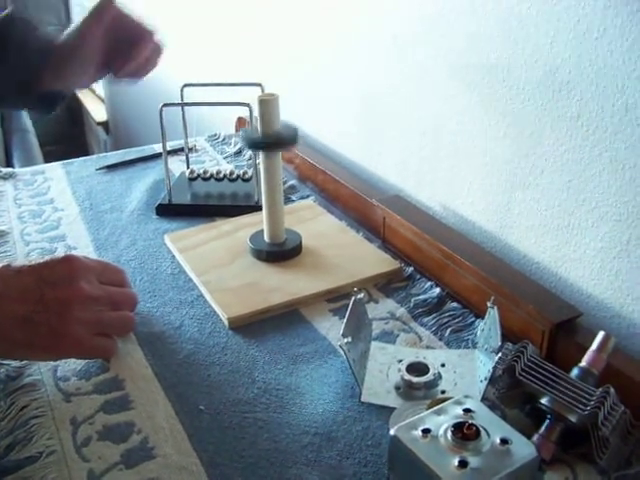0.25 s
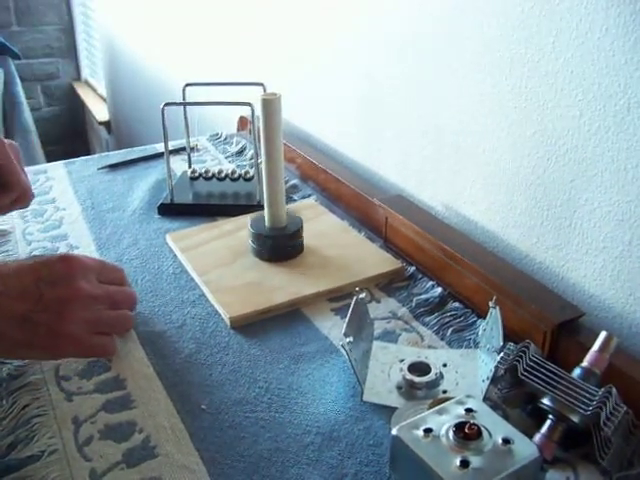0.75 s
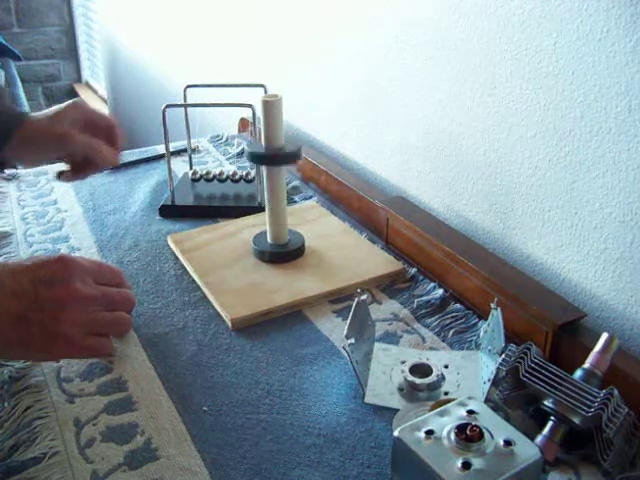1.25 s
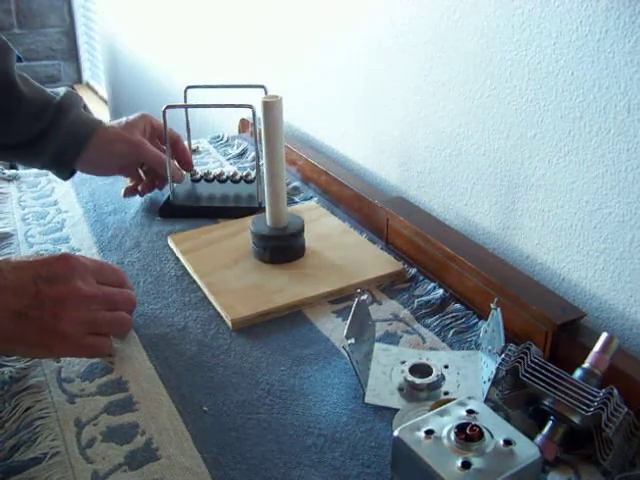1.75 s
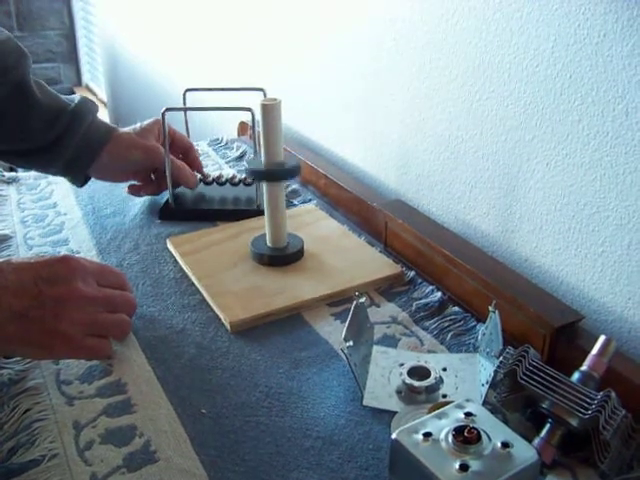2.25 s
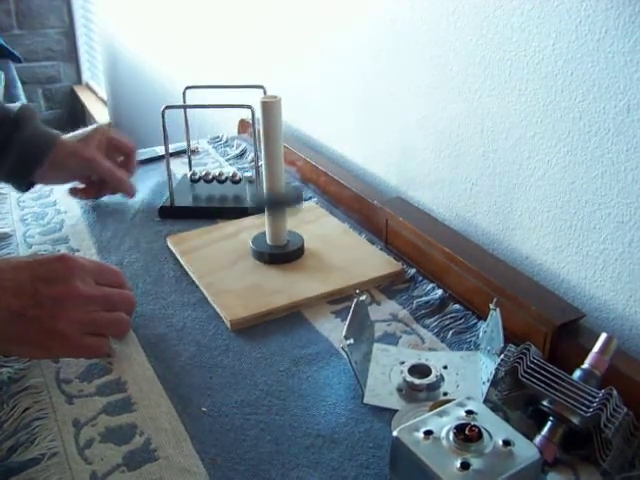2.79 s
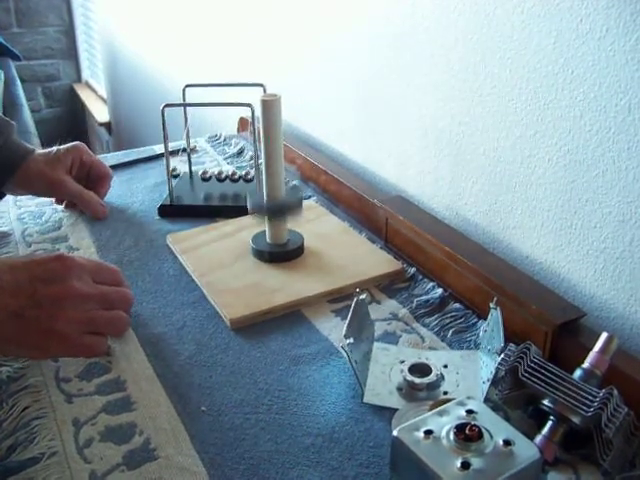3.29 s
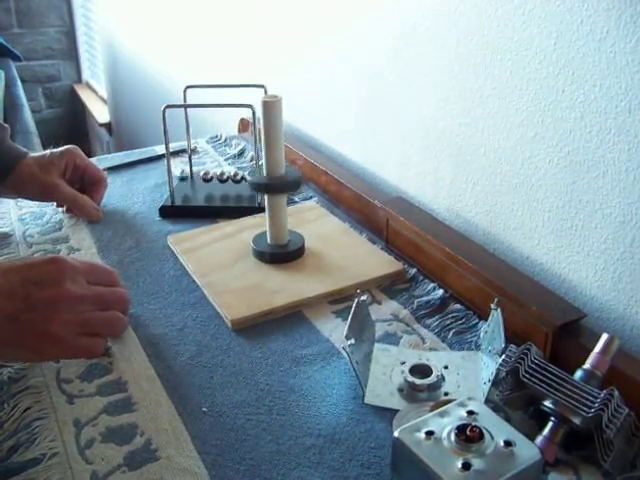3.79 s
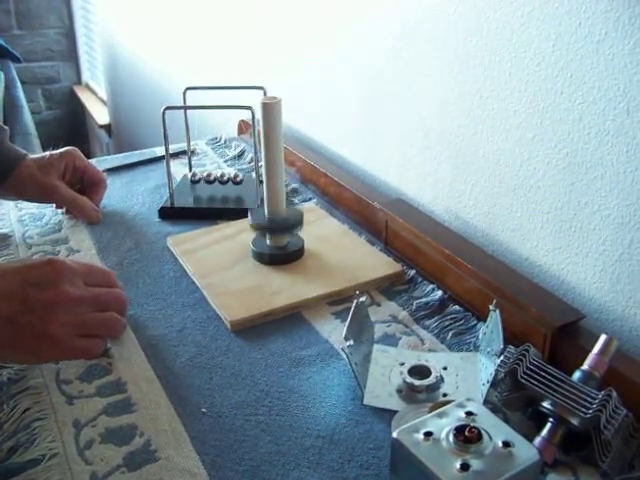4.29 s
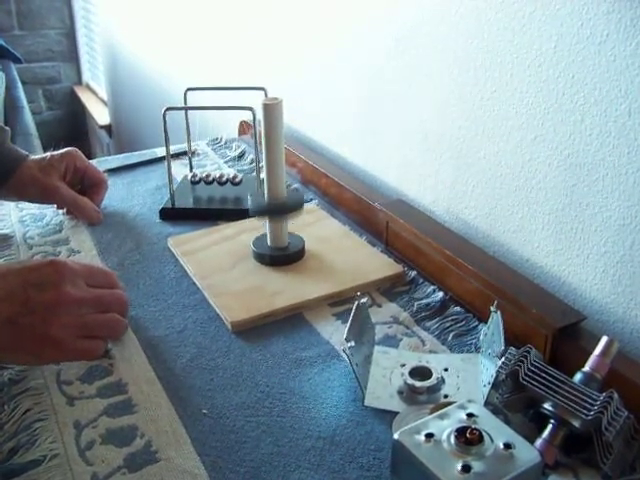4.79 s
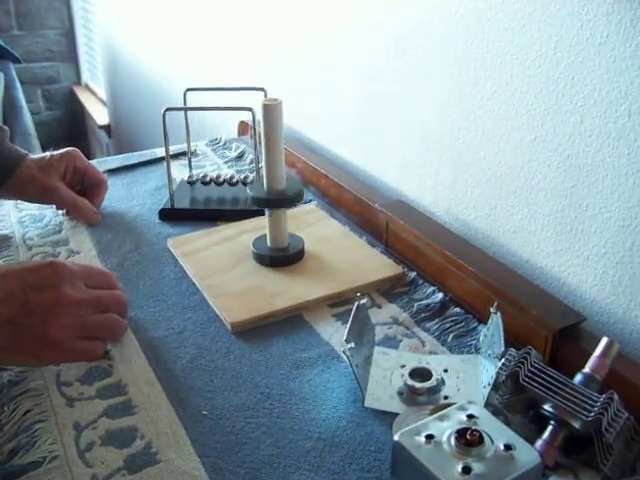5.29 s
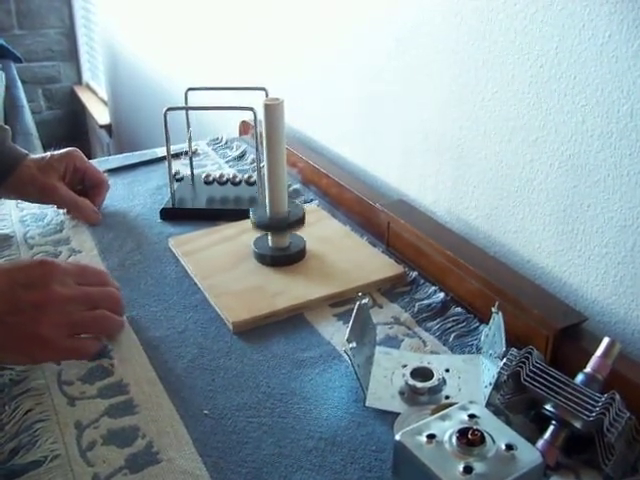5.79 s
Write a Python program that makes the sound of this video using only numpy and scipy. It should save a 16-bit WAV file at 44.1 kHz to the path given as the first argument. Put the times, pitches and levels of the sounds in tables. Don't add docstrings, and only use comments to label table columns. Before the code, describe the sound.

In a quiet room, a ring magnet bobs on a wooden peg with dry, grainy scrapes, small rattling catches and a few soft woody taps on its board. Just before three seconds a loud steel-ball clack starts a steady run of sharp clicks, about three per second, some doubled or stuttering, louder at the end. Low hum and hiss stay underneath; a small camera microphone sounds thin and band-limited.

```python
import sys
import numpy as np
from scipy import signal
from scipy.fft import rfft, irfft, next_fast_len
from scipy.io import wavfile
from scipy.ndimage import map_coordinates

SR = 44100
rng = np.random.default_rng(int(sys.argv[2]) if len(sys.argv) > 2 else 0)


def rack_gain(trim_db):
    fader = np.asarray(trim_db, float)
    return 10 ** (fader / 20)


def to_wav(sig):
    pcm = np.clip(np.atleast_2d(sig), -1, 1) * 32767
    pcm = np.round(pcm).astype(np.int16)
    wavfile.write(sys.argv[1], SR, pcm.T)


N = 266805
T = np.arange(N) / SR


def unit(x):
    return x / np.sqrt(np.mean(x ** 2) + 1e-20)


def along(points, hz):
    f, v = np.transpose(points)
    return np.interp(np.log(hz + 1), np.log(f + 1), v)


def curves(rows):
    s, *cols = np.transpose(rows)
    return [np.interp(T, s, c) for c in cols]


def wobble(rate_hz):
    return map_coordinates(rng.standard_normal(int(N * rate_hz / SR) + 4), [T * rate_hz])


def filtered(x, response):
    m = next_fast_len(N + SR // 2)
    return irfft(rfft(x, m) * response(np.fft.rfftfreq(m, 1 / SR)), m)[..., :N]


def mode(centre_hz, width_hz):
    return lambda f: 1j * f * width_hz / (centre_hz ** 2 - f * f + 1j * f * width_hz)


def noise(spectrum):
    return unit(filtered(rng.standard_normal(N), lambda hz: rack_gain(along(spectrum, hz))))


# time_s, hum_db, hiss_db
BACKGROUND_LEVELS = [(0.0, -63.5, -58), (0.55, -63.5, -61), (2.56, -64, -61), (4.68, -62.5, -58.5),
                     (5.21, -58.5, -56), (5.75, -60.5, -56.5), (6.05, -56.5, -56)]
# freq_hz, density_db_per_hz
HUM_SPECTRUM = [(12, -59), (20, -41), (97, -2.5), (145, 1), (214, -1.5), (297, -12.5), (330, -7),
                (430, -41.5), (730, -120)]
# freq_hz, density_db_per_hz
HISS_SPECTRUM = [(150, -24), (250, -8.5), (458, -9), (513, -7), (1250, -9.5), (1310, -10), (2730, -16),
                 (7800, -24), (10100, -58.5), (17200, -120)]
# freq_hz, width_hz, over_hiss_db
DRONES = [(407, 15, 9), (694, 23, 4.5)]


def background():
    hum_db, hiss_db = curves(BACKGROUND_LEVELS)
    hum = rack_gain(hum_db + 3.0 + 2.0 * wobble(6)) * noise(HUM_SPECTRUM)
    drones = lambda f: 1 + sum((rack_gain(db) - 1) * abs(mode(hz, width)(f)) for hz, width, db in DRONES)
    hiss = filtered(noise(HISS_SPECTRUM), drones)
    return hum + rack_gain(hiss_db - 1.5 + 0.17 * wobble(21)) * hiss


# freq_hz, t60_s
ROOM_DECAY = [(2000, 0.65), (8000, 0.21)]
# freq_hz, level_db
ROOM_COLOUR = [(2000, -3), (5000, 4.5), (6650, -1), (7500, 1.5)]


def room(x):
    wet = np.zeros(N + SR)
    edges = [round((s - .1) * SR) for s, *_ in SWINGS] + [N]
    for start, stop in zip(edges, edges[1:]):
        hz, t, z = signal.stft(rng.standard_normal(SR // 3), SR, nperseg=256)
        build = .4 + 1 / (1 + np.exp((.044 - t) / .002))
        fade_db = along(ROOM_COLOUR, hz)[:, None] - 60 * t / along(ROOM_DECAY, hz)[:, None]
        tail = signal.istft(z * rack_gain(fade_db) * build, SR, nperseg=256)[1]
        answer = signal.fftconvolve(x[start:stop], tail / np.linalg.norm(tail))
        wet[start:][:len(answer)] += answer
    return wet[:N]


# start_s, knock_peak_db, thud_db
KNOCKS = [(0.149, -45, -50), (0.479, -39.5, -50), (0.498, -50, -44.5), (0.551, -63, -49.5),
          (0.826, -43, -51), (1.166, -45.5, -49), (4.605, -47, -46)]
# freq_hz, width_hz, level_db
BOARD_MODES = [(150, 50, 0), (420, 300, 0), (780, 350, -1), (1250, 450, 0)]


def board():
    taps, thuds = np.zeros(N), np.zeros(N)
    contact = np.hanning(round(0.0083 * SR))
    for s, db, thud_db in KNOCKS:
        rough = contact * rng.standard_normal(len(contact))
        taps[round(s * SR):][:len(contact)] = rack_gain(db + 8.0) * rough
        thuds[round(s * SR)] = rack_gain(thud_db + 50)
    thud_mode, *wood_modes = BOARD_MODES
    wood = lambda f: sum((-1) ** k * rack_gain(db) * mode(hz, width)(f) ** 2
                         for k, (hz, width, db) in enumerate(wood_modes))
    soft = lambda f: 1 / (1 + 1j * f / 360) ** 2
    return filtered(taps, wood) + filtered(thuds, lambda f: mode(*thud_mode[:2])(f) * soft(f))


# turn_s, scrape_db, low_mode_re_scrape_db, late_over_early_half_db, mid_lull_db
STROKES = [(0.029, -55.5, -8.5, 0, -4), (0.328, -63, -4.5, -0.5, 5), (.67, -60.5, -3.5, 0.5, -1),
           (1.0, -63, -6, 1.5, 6), (1.33, -57.5, -8.5, -0.5, 0.5), (1.66, -58.5, -3, 0, -1.5),
           (1.99, -63.5, -9.5, 3, 4), (2.308, -58, -6, -2, -2), (2.621, -57.5, -8, -3, 2),
           (2.938, -60.5, -6, -0.5, 0.5), (3.251, -57, -7.5, -1, -6), (3.568, -57, -8, 0, -8),
           (3.869, -59.5, -7.5, 2, -4.5), (4.168, -61, -6, -3, -10), (4.46, -59, -4.5, -1, -8),
           (4.768, -60.5, -1.5, -1.5, -8), (5.07, -59.5, -1.5, 0.5, -11), (5.36, -62, -4, 0, -6),
           (5.65, -60, -3, -0.5, -12.5), (5.951, -58, -1, 3, -1)]


def sliding_levels():
    end_stroke_s = .31
    rest_db, rest_width, lull_width = -12, 0.15, 0.059
    turns, level_db, low_db, lean_db, lull_db = np.transpose(STROKES)
    turn_times = [turns[0] - end_stroke_s, *turns, turns[-1] + end_stroke_s]
    place = np.interp(T, turn_times, np.arange(-1, len(turns) + 1))
    along_stroke = place % 1
    middles = np.arange(len(turns)) + .5
    rest = np.exp(-(np.minimum(along_stroke, 1 - along_stroke) / rest_width) ** 2)
    stroke = np.clip(place, 0, len(turns) - 1).astype(int)
    lull = lull_db[stroke] * np.exp(-((along_stroke - .5) / lull_width) ** 2)
    lean = lull - lean_db[stroke] * np.sin(2 * np.pi * along_stroke)
    scrape_db = np.interp(place, middles, level_db) + lean + rest_db * rest
    return scrape_db, np.interp(place, middles, low_db)


# start_s, top_mode_db, low_mode_re_top_db, middle_mode_re_top_db
TICKS = [(0.0094, -50, 11, 6.5), (0.0744, -36.5, -23, -6), (0.0902, -37, -21, -7), (0.1479, -42, 2.5, -1),
         (0.158, -39.5, -23, -5), (0.18, -37, -30, -19), (0.1955, -44, -25, 3), (0.459, -45.5, 1, 3),
         (0.4719, -38.5, -3, 6.5), (0.5067, -43.5, -1, -2), (0.5332, -36, -1.5, -14),
         (0.7648, -40.5, -9, -2), (0.7946, -43, -11, 5), (1.0783, -38, -27, -9), (1.131, -39, -8.5, -3),
         (1.189, -45.5, -3, 8.5), (1.2394, -38, -23, -4.5), (1.427, -41, -23, -14), (1.5308, -41.5, -10, 0),
         (1.7, -47.5, 4.5, -13), (1.7366, -49, -3, 3.5), (1.752, -43, -12, -2), (1.7706, -41.5, -4, 0),
         (2.073, -48, -22, 7), (2.1127, -43, -6, 3.5), (3.6117, -45.5, 2.5, -12), (3.913, -45, 4, 1),
         (4.0257, -43.5, 4.5, 0), (4.266, -42, -21, -16), (4.9848, -47, 4.5, -14)]
# start_s, top_mode_db, low_mode_re_top_db, middle_mode_re_top_db
DRAGS = [(0.2384, -46, -10, -14), (0.387, -41, -11, -17), (0.4375, -40, -17, -12), (0.5446, -40, -28, 3),
         (0.8414, -48, -7, 5), (0.9038, -42, -7, -6), (1.448, -43, -8, -17), (1.46, -45, -2, -4),
         (1.556, -42, -15, 1.5), (1.5843, -42, -18, -12), (1.7984, -52, 1, 6), (2.089, -45.5, -12, -4),
         (2.161, -54, 4, 10.5), (3.033, -40, -14, -17), (3.34, -43.5, -4, -21), (3.6318, -40.5, -5, -17),
         (3.6582, -46, -6, -13), (3.9659, -40.5, -3.5, -14), (3.9814, -37.5, -13, -7),
         (3.988, -40.5, -15, -14), (4.2467, -38, -5, -16), (4.342, -41, -6, -6), (4.5398, -42, -3, -22),
         (4.6724, -43.5, -14, -13), (4.82, -44, -8, -16), (5.157, -40.5, -2, -11), (5.4459, -46, 3, -20),
         (5.4645, -45, -12, -12), (5.4804, -46.5, -1, -1.5), (5.8701, -46, -7, -8)]
# start_s, top_mode_db, low_mode_re_top_db, middle_mode_re_top_db
BRUSHES = [(0.1107, -37.5, -14, 0), (0.222, -40, -11, -9), (0.2544, -46.5, -1, -7), (0.704, -49.5, -6, -8),
           (0.755, -45, -10, 2), (0.8016, -37.5, -15, -7), (1.0444, -46, -2, -8), (1.1039, -49, -5, -2),
           (1.482, -52, -8, 3), (1.8933, -48.5, -12, 1), (2.045, -48.5, -22, 2), (2.2488, -45.5, -14, -10),
           (2.3855, -43, -12, -22), (2.4324, -53.5, 2, 4), (2.5014, -51, 0.5, 2), (2.5404, -43.5, -15, -3),
           (2.692, -43.5, -10, -15), (2.723, -44.5, -7, -16), (2.9961, -47, -10, -3),
           (3.3564, -45, -7, -15), (3.9305, -44.5, 0, -3), (4.279, -39, -2, -3), (4.5545, -37.5, -7, -16),
           (4.8614, -45, 2, -10), (5.1392, -40, -3, -15), (5.2794, -39.5, -8, -11), (5.526, -51, 6.5, -6),
           (5.7034, -45, -15, -13), (5.7324, -46, -6, -10), (5.758, -43, -15, -9)]


def grips(scrape_db, low_db, count):
    kinds = (TICKS, 4.5, -3.5), (DRAGS, 7.9, -4.5), (BRUSHES, 15, -8)  # hold_ms, drive_db
    firm = [(s, hold_ms, db + drive_db, low, middle)
            for table, hold_ms, drive_db in kinds
            for s, db, low, middle in table]
    slip_db, spread_db, slip_ms, tone_db = 2, 5, 7.5, 1
    middle_rise_db_per_s = 2
    a, b, c, d, e = rng.uniform(-1, 1, (count, 5)).T
    s = np.clip((np.arange(count) + .5 + 0.44 * a) / count * T[-1], 0, T[-1])
    busy = abs(s[:, None] - np.transpose(firm)[0] - .003).min(axis=1) < .012
    at = (s * SR).astype(int)
    slips = [s,
             slip_ms * np.exp(0.56 * b),
             scrape_db[at] + slip_db + spread_db * c - 30 * busy,
             low_db[at] + 7 + tone_db * d,
             -1.5 + middle_rise_db_per_s * s + tone_db * e]
    return np.concatenate([np.transpose(firm), slips], axis=1)


def catches(times, holds_ms, column_db):
    grip = np.zeros(N + SR)
    for s, length_ms, db in zip(times, holds_ms, column_db):
        t = np.arange(round((length_ms / 1000 + .012) * SR)) / SR
        bite = 1 - np.exp(-(t / 0.00032) ** 2)
        release = 1 / (1 + np.exp((t - length_ms / 1000) / 0.00096))
        grip[max(round((s - .002) * SR), 0):][:len(t)] += rack_gain(2 * db) * bite * release
    return grip[:N]


# freq_hz, width_hz, sliding_db
RING_MODES = [(1188, 99, -2), (2866, 173, 4), (4934, 470, 0), (5036, 120, -11), (7050, 510, 0.5)]
# freq_hz, density_db_per_hz
GRIT_SPECTRUM = [(1500, -32), (3000, -1.5), (4500, -10), (6000, 2.5), (7500, -6.5)]
LIFTS = [.062, .098, .375, .414, .742, .782, .885, 1.066, 1.176, 1.41, 1.455, 1.472, 1.499, 1.763, 1.781,
         2.083, 2.103, 2.144, 2.421, 2.464, 2.567, 2.71, 2.742, 2.78, 3.091, 3.407, 3.437, 3.711]


def ring_magnet():
    scrape_db, low_db = sliding_levels()
    times, holds, top, low, middle = grips(scrape_db, low_db, count=140)
    lifts = sum(np.exp(-((T - s) / .0055) ** 4) for s in LIFTS)
    chatter_db = 2.8 * wobble(90) - 16 * lifts
    grain = unit(rack_gain(3.2 * wobble(450)))
    sliding = [scrape_db + low_db, scrape_db + low_db, scrape_db, scrape_db, scrape_db]
    tilt = 2.5 * rng.standard_normal(len(top))
    caught = [top + low - 9,
              top + low - .6,
              top + middle - 3.5 + tilt,
              top + middle - 3.6 - tilt,
              top - 1.4]
    sound = np.zeros(N)
    for (hz, width, db), slide_db, catch_db in zip(RING_MODES, sliding, caught):
        slide_power = rack_gain(2 * (slide_db + db + chatter_db - 2.5))
        drive = np.sqrt(slide_power + catches(times, holds, catch_db))
        friction = drive * grain * np.sign(rng.standard_normal(N))
        gain = np.sqrt(SR / (np.pi * width))
        sound += gain * filtered(friction, lambda f: mode(hz, 1.5 * width)(f) ** 2)
    grit = np.sqrt(rack_gain(2 * (scrape_db + chatter_db + 0.5)) + catches(times, holds, top - 4))
    return sound + grit * grain * noise(GRIT_SPECTRUM)


# start_s, peak_db, then any later equal blows as after_ms
SWINGS = [(2.828, -12.7), (3.1405, -21.8, 5.8), (3.4551, -21.1), (3.76973, -21.8, 1.09, 2.11, 12.61),
          (4.08528, -21, 2.52, 13.72), (4.40177, -21.3, 11.79), (4.7146, -21, 1.45, 2.93, 12.93),
          (5.02841, -19.8, 1.5, 3.86, 11.64), (5.34571, -18.3, 1.02, 5.72), (5.66247, -16.8),
          (5.97333, -17.2, 3.72)]
# start_s, peak_db
MORE_CONTACTS = [(3.11651, -35.7), (3.12222, -38.3), (3.14261, -26.8), (3.14347, -34.7), (3.40068, -37),
                 (3.41673, -33.4), (3.45805, -29), (3.45893, -36.9), (3.46526, -24.3), (3.6866, -36),
                 (3.70392, -39.8), (4.39948, -28.9), (4.40032, -37), (5.10712, -35.4), (5.34787, -21.4),
                 (5.37578, -38.5), (5.38497, -34.2), (5.39145, -37.1), (5.65955, -20.9), (5.66125, -22.8),
                 (5.92955, -40.3), (5.94719, -35.6), (5.97887, -20.8), (5.99576, -42.2)]


def contacts():
    volleys = [(s + ms / 1000, db) for s, db, *later in SWINGS for ms in [0, *later]]
    return sorted(volleys + MORE_CONTACTS)


# freq_hz, density_db_per_hz
CLICK_SPECTRUM = [(530, -85), (900, -42), (2420, -17), (3450, -17), (5010, -9), (6290, -1.5), (6650, 6),
                  (7280, -0.5), (7620, -8), (7900, -16.5), (10300, -25), (17400, -120)]


def click_shape(causal):
    size = 1024
    log_gain = np.log(rack_gain(np.maximum(along(CLICK_SPECTRUM, np.fft.rfftfreq(size, 1 / SR)), -70)))
    cepstrum = irfft(log_gain)
    cepstrum[1:size // 2] *= 2
    cepstrum[size // 2 + 1:] = 0
    shape = irfft(np.exp(log_gain + 1j * causal * rfft(cepstrum).imag))
    peak = np.argmax(abs(shape))
    return -np.roll(shape, size // 2 - peak) / shape[peak]


# delay_s, level_db
ECHOES = [(.0007, -15), (.0011, -19), (.00175, -17), (.0026, -23), (.0045, -29), (.0125, -31)]


def balls():
    blows, bodies = np.zeros(N + SR), np.zeros(N + SR)
    for s, db in contacts():
        blows[round(s * SR)] += rack_gain(db)
        bodies[round(s * SR)] += rack_gain(db) * (rack_gain(rng.normal(-0.87, 0.83)) - 1)
        for delay_s, echo_db in ECHOES:
            a, b = rng.standard_normal(2)
            echo_s = s + delay_s * (1 + .04 * a)
            blows[round(echo_s * SR)] += rack_gain(db + echo_db + 1.8 * b)
    struck = blows[:N] + filtered(bodies[:N], lambda f: 1 / (1 + (f / 5200) ** 8))
    return rack_gain(2.1) * signal.fftconvolve(struck, click_shape(causal=0.32), mode="same")


def scene():
    clacks, ring = balls(), ring_magnet()
    return (background() + rack_gain(-14.5) * room(clacks) + board() + ring + clacks)[None]


def low_pass(x):
    return signal.sosfilt(signal.butter(12, 9620, fs=SR, output="sos"), x)


# freq_hz, width_hz
NOTCHES = [(299, 45), (969, 40)]
# freq_hz, level_db
MIRROR_SPECTRUM = [(7950, -45), (8150, 2.5), (8600, -4), (9000, -25.5), (9500, -53.5), (9700, -100)]


def record(dry):
    rate_hz = 16000
    notched = lambda f: np.prod([1 - mode(hz, width)(f) for hz, width in NOTCHES], axis=0)
    kept = filtered(dry, lambda f: notched(f) / np.sqrt(1 + (f / 7550) ** 70))
    folded = 2 * kept * np.cos(2 * np.pi * rate_hz * T)
    mirror = filtered(folded, lambda f: (f > rate_hz / 2) * rack_gain(along(MIRROR_SPECTRUM, f) - 12.5))
    return low_pass(kept + mirror)


dry = scene()
out = record(dry)
to_wav(out)
```